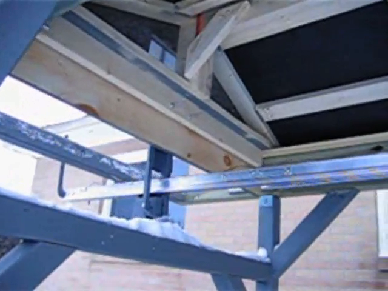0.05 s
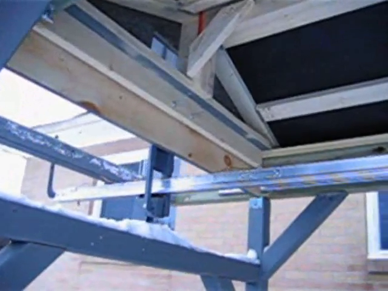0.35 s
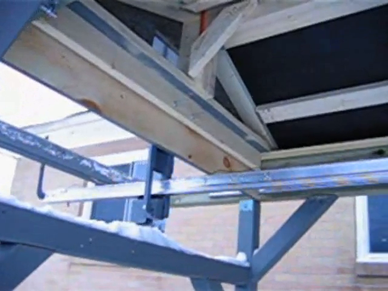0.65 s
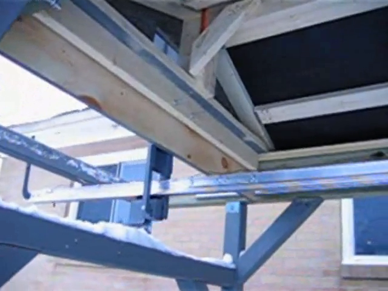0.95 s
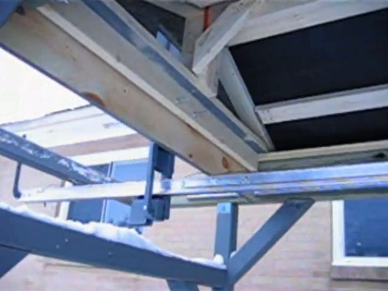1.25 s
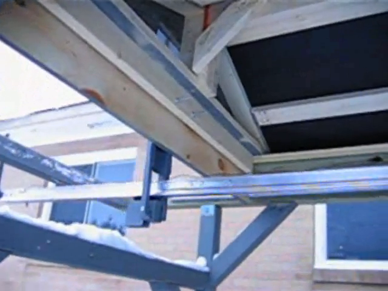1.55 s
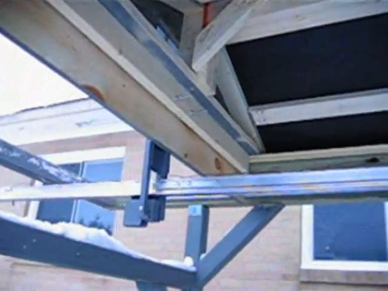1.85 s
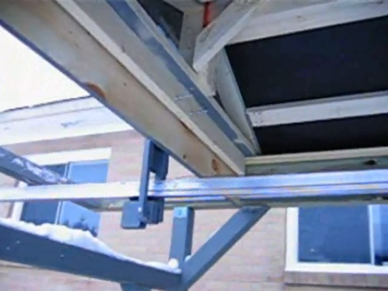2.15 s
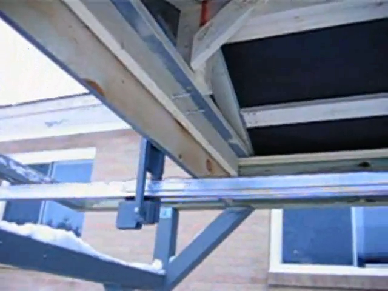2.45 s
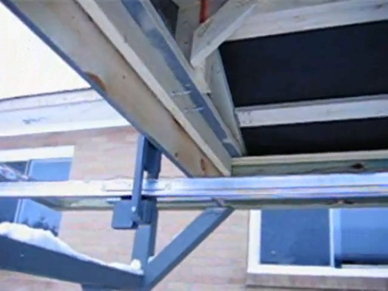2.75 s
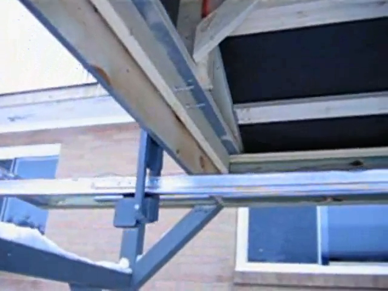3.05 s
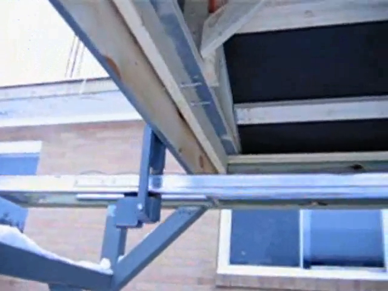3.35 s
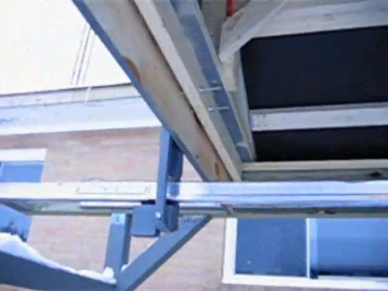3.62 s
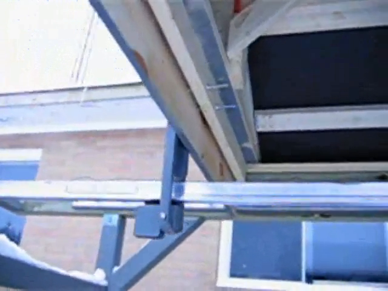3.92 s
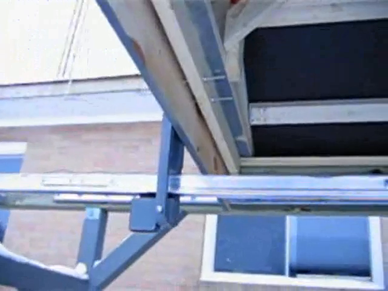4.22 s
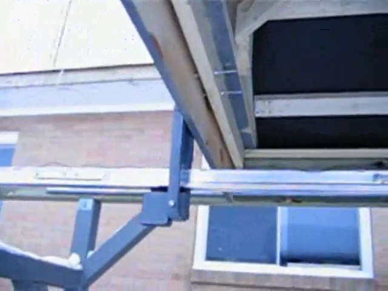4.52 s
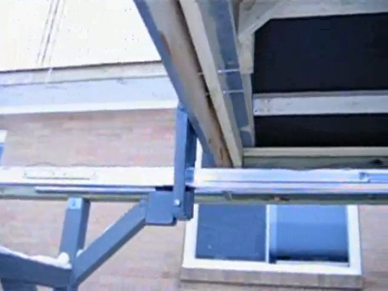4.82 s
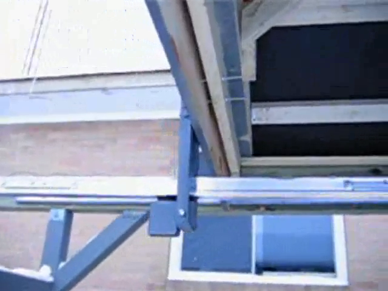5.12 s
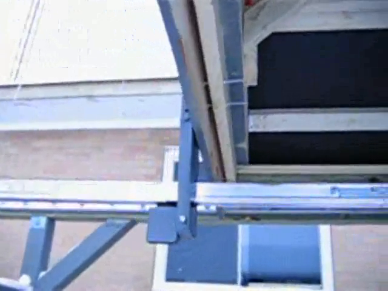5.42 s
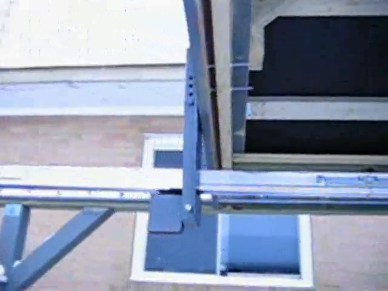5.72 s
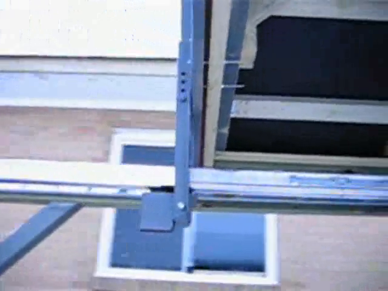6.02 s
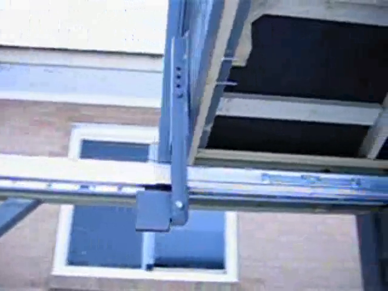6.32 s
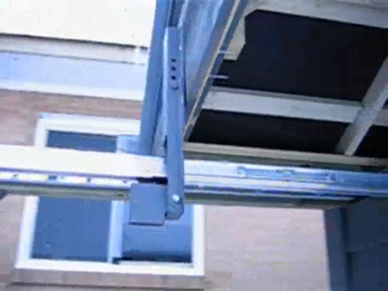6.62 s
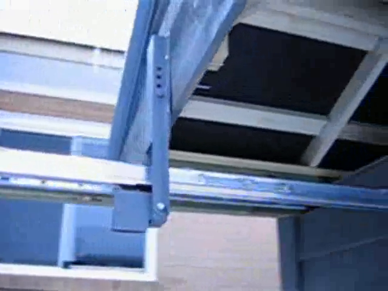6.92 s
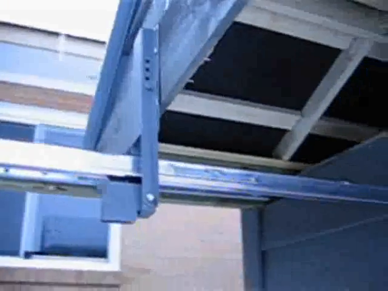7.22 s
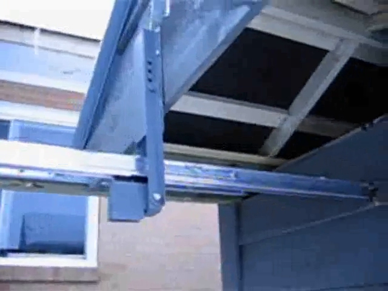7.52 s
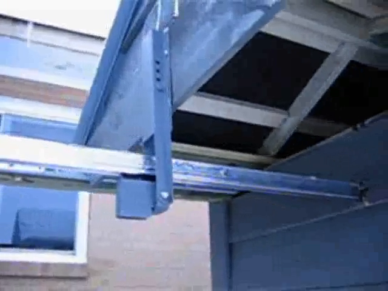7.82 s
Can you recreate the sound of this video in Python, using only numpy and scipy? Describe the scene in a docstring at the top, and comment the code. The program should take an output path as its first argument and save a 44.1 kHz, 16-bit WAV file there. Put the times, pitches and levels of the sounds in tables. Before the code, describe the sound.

Outdoors, just under the eaves, a wooden roof rolls along a metal rail with a continuous motor hum, gear whine and chain clatter. Sharp metal creaks and one dull wooden knock come early, followed by scattered chain clacks and a few more creaks. The wheels grind throughout, and the rattle swells toward the end as the roof comes overhead. Low wind rumbles on the microphone, with one late gust.

```python
"""A motor moves a shed roof

A geared mains motor drags a wooden shed roof along a steel rail, heard from just under the eaves.
The frame carries the motor's hum and gear whine. The drive chain rattles link by link, and the
wheels grind and groan. Steel fittings creak and squeal under the load, and the timber knocks once.
Wind or handling on the microphone adds a low rumble, with one gust."""
import sys
import numpy as np
from scipy import signal
from scipy.fft import rfft, irfft
from scipy.io import wavfile
from scipy.ndimage import uniform_filter1d

SR = 44100
rng = np.random.default_rng(int(sys.argv[2]) if len(sys.argv) > 2 else 0)


def generate_wav(signal):
    """Clip the signal to [-1, 1] and save it as 16-bit WAV at the path in sys.argv[1]."""
    frames = np.transpose(np.atleast_2d(signal))
    scaled = np.clip(frames, -1, 1) * 32767
    pcm = np.round(scaled).astype(np.int16)
    wavfile.write(sys.argv[1], SR, pcm)


N = 351036
T = np.arange(N) / SR

HUM_HZ = 120  # twice the mains frequency
# motor hum, swelling and dipping as the listener moves about the shed: time_s, level_db
HUM_LEVEL = [(0.04, -30), (0.88, -26), (1.22, -29), (1.46, -25), (1.64, -30), (2.02, -26), (2.4, -37),
             (2.5, -29.5), (6.24, -24), (6.5, -39.5), (6.6, -28.5), (7.48, -26), (7.6, -34), (7.94, -29.3)]
# the hum's overtone at twice its pitch: time_s, level_db
HUM_OCTAVE_LEVEL = [(0, -45), (.74, -38.5), (.86, -54), (.95, -35.5), (1.85, -33), (2.1, -43), (2.34, -62),
                    (2.48, -36.5), (3.05, -32), (3.62, -38.5), (4.4, -38.5), (5.08, -44), (5.32, -41),
                    (6.75, -41.5), (7.45, -34), (7.96, -35)]
# the hum's overtone at three times its pitch: time_s, level_db
HUM_THIRD_LEVEL = [(0, -42.5), (.9, -47), (1.9, -40), (3, -45), (5.5, -46.5), (6.2, -49), (7.2, -59),
                   (7.6, -43)]

GEAR_TEETH, TEETH_PER_LINK = 24, 40  # teeth that meet per shaft turn, and per chain link
USUAL_TOOTH_HZ, WHINE_DB_PER_HZ = 705, 0.19
# motor speed as gear teeth meeting per second, sagging under load: time_s, tooth_hz
MOTOR_SPEED = [(0, 699), (.9, 697), (1.08, 707), (1.5, 704), (2.3, 716), (2.56, 698), (2.9, 717),
               (3.3, 700), (4.22, 710), (4.34, 699), (4.62, 711), (4.94, 700), (5.7, 709), (6.08, 701),
               (6.34, 715), (6.65, 710), (7.2, 717), (7.96, 713)]
# gear whine at the usual speed, fading as the roof comes overhead: time_s, level_db
WHINE_LEVEL = [(0, -36), (.7, -39), (1.15, -39), (1.65, -37.5), (2.85, -36.5), (3.6, -40), (4.9, -34.5),
               (5.7, -39.5), (6.4, -38), (7.2, -47), (7.96, -49)]
# weaker gear tones beside the whine: cycles_per_turn, relative_db
GEAR_TONES = [(20, -12), (25, -13.5), (28, -19.5)]

# how far the roof has come overhead: time_s, share_0_to_1
ROOF_OVERHEAD = [(0, 0.24), (5.4, 0.37), (6.7, 0.6), (7.96, 0.62)]
# rise and fall of the chain's rattle: time_s, relative_db
RATTLE_LEVEL = [(0.04, -41.5), (0.28, -40.5), (1.78, -41.5), (2.32, -38.5), (5.0, -41), (5.64, -36.5),
                (5.88, -38.5), (6.4, -35), (7.94, -34)]
# tone colour of the chain as heard through the microphone, which shapes the highest treble,
# with the roof far away: frequency_hz, gain_db
CHAIN_HEARD_FAR = [(600, -8.5), (1100, 0.5), (1400, -5.5), (2000, -1.5), (2600, 3), (3200, -2.5),
                   (3950, -4.5), (5300, -17), (7000, -16.5), (7700, -18.5), (8600, -21), (9800, -34),
                   (12500, -47), (13700, -25), (15500, -32)]
# the same with the roof overhead: frequency_hz, gain_db
CHAIN_HEARD_NEAR = [(600, -1), (1400, -5), (1900, 1), (2350, 5), (2750, 1.5), (3200, -9.5), (4000, -19.5),
                    (5300, -29.5), (7600, -31), (8700, -18.5), (9800, -46), (12400, -45), (13400, -21),
                    (15500, -50)]
# links that snap hard onto the sprocket, the chain's toothed wheel: time_s, relative_db
LINK_CLACKS = [(0.1067, -25.5), (0.2394, -24.5), (0.2972, -19.5), (0.3556, -20), (0.414, -25), (0.471, -25),
               (2.6728, -23), (2.8394, -18), (3.0066, -21.5), (3.057, -21), (3.1148, -22.5),
               (3.1722, -21.5), (3.3657, -21.5), (4.0143, -23.5), (4.1574, -23.5), (4.4398, -28.5),
               (4.6199, -26), (4.899, -28), (5.4086, -25.5), (6.0841, -20.5), (6.354, -21.5), (6.7466, -27),
               (6.8538, -25), (7.636, -22.5)]
# tone colour of one clack as it is heard: frequency_hz, gain_db
CLACK_COLOUR = [(700, -22), (1500, -16), (2100, -2), (2700, 2), (3150, -1.5), (3600, -11.5), (4500, -5.5),
                (5500, -17), (7300, -14), (8300, -13), (9600, -39), (12500, -34), (13700, -30),
                (15500, -14)]

# rise and fall of the wheels' noise on the rail: time_s, relative_db
ROLL_LEVEL = [(0.04, -35.8), (1.4, -36.5), (1.78, -34.5), (3.04, -36.5), (3.6, -34), (4.14, -38),
              (6.48, -36.5), (6.74, -35.5), (7.94, -34.0)]
# tone colour of the wheels with the roof far away: frequency_hz, gain_db
WHEELS_FAR_COLOUR = [(130, -7), (200, -0.5), (275, 6), (315, -3.5), (410, -2), (500, 4.5), (590, -2.5),
                     (660, 0.5), (810, 1), (900, -8.5), (1100, -12), (1400, -15), (2500, -41)]
# the same with the roof overhead: frequency_hz, gain_db
WHEELS_NEAR_COLOUR = [(130, -2.5), (200, -10), (280, -0.5), (410, 0.5), (470, -5), (530, 1), (590, 2.5),
                      (830, -4), (890, -8), (950, 3.5), (1010, -12), (1090, -2.5), (1400, -38.5),
                      (2500, -46)]
# the higher of the roof beams' two booming notes: time_s, relative_db
HIGH_BEAM_LEVEL = [(0.04, -36), (0.38, -40.5), (3.06, -34.5), (3.62, -30), (4.2, -32.5), (4.82, -40.5),
                   (6.62, -37.5), (7.94, -40)]
# groans of a loaded wheel: start_s, length_s, start_pitch_hz, level_db
WHEEL_GROANS = [(1.7, 0.22, 512, -34.5), (6.637, 1.0, 488.7, -42)]

# slips of the creaking steel fittings: time_s, relative_db
FITTING_SLIPS = [(0.5357, -28), (0.5522, -24.5), (0.5997, -20.5), (0.64, -20), (0.6612, -24.5),
                 (0.871, -27), (0.8947, -30), (0.9288, -36), (1.031, -32), (1.7287, -29.5), (1.7388, -28),
                 (1.8412, -27.5), (1.861, -30), (1.9136, -34), (1.927, -24.5), (1.9447, -23.5),
                 (2.142, -32), (2.1643, -26.5), (2.1984, -28), (2.2852, -24), (2.3199, -21.5),
                 (2.3525, -20.5), (3.6339, -29), (4.0585, -26.5), (4.1042, -28), (4.1796, -30),
                 (5.311, -20.5), (5.3462, -30)]
# tone colour of one slip as it is heard: frequency_hz, gain_db
SLIP_COLOUR = [(1500, -9), (2600, -6), (3300, -12.5), (4000, 5), (4500, -6), (5000, -6), (5500, -15.5),
               (6300, -9.5), (7050, -7), (8000, -18.5), (9500, -48), (13000, -32), (15000, -20),
               (16000, -19)]
# notes a fitting rings with: pitch_hz, relative_db, ring_time_s
STEEL_NOTES = [(3380, 14, 0.081), (3915, -6, 0.012), (4570, -22, 0.01), (7380, -21.5, 0.051)]
# when a fitting squeals: start_s, length_s, relative_db
FITTING_SQUEALS = [(0.947, 0.39, -60)]
# tones of the squeal: pitch_hz, relative_db
SQUEAL_TONES = [(4910, 0), (6150, -3)]
# when the timber knocks: time_s, relative_db
TIMBER_KNOCKS = [(0.928, -19.5)]
# notes the timber rings with: pitch_hz, relative_db, ring_time_s
TIMBER_NOTES = [(260, -8, 0.12), (330, 5, 0.091), (414, 2, 0.41), (590, -18, 0.12), (600, 7, 0.045),
                (716, 10, 0.057), (934, 3.5, 0.15), (944, -15, 0.12), (1100, 2, 0.16), (1520, -7, 0.12),
                (1610, -14, 0.079)]
# tone colour of the timber's dull thud: frequency_hz, gain_db
THUD_COLOUR = [(150, -25), (400, 3), (650, 9), (1100, -9), (1650, -13.5), (2500, -31), (5000, -43)]

# low rumble of wind or handling on the microphone, with one gust: time_s, relative_db
LOW_RUMBLE_LEVEL = [(0.04, -33), (1.08, -33.5), (1.92, -35), (2.5, -34), (3.54, -37), (3.8, -32),
                    (6.4, -39.5), (6.66, -28.5), (7.42, -41), (7.94, -34)]
# tone colour of that rumble: frequency_hz, gain_db
RUMBLE_COLOUR = [(12, -20), (24, 9), (36, 17), (48, 7.5), (62, 5.5), (110, -12), (135, 6.5), (190, -12),
                 (300, -51)]


def motor_hum(flutter_db=1.01, flutter_rad=0.49):
    """The motor's magnets pull twice per mains cycle; the shaking frame makes the hum flutter."""
    out = 0
    for multiple, levels in enumerate([HUM_LEVEL, HUM_OCTAVE_LEVEL, HUM_THIRD_LEVEL], 1):
        phase = 2 * np.pi * HUM_HZ * multiple * T + flutter_rad * drift(4.5)
        level_db = curve(levels) + flutter_db * drift(25)
        out = out + undb(level_db) * np.sqrt(2) * np.sin(phase)
    return out


def gear_whine(tooth_hz):
    """Gear teeth whine as they meet, louder at speed; play between them blurs the weaker tones."""
    level_db = curve(WHINE_LEVEL) + WHINE_DB_PER_HZ * (tooth_hz - USUAL_TOOTH_HZ)
    unsteady_hz = tooth_hz * (1 + 0.002476 * drift(22))
    shaft_angle = 2 * np.pi * np.cumsum(unsteady_hz) / SR / GEAR_TEETH
    tones = undb(1.6 * drift(16)) * np.sin(GEAR_TEETH * shaft_angle)
    for cycles, tone_db in GEAR_TONES:
        play = 1.5 * drift(12)
        tones += undb(tone_db + 2 * drift(10)) * np.sin(cycles * shaft_angle + play)
    return undb(level_db) * np.sqrt(2) * tones


def link_landings(tooth_hz, jitter_s=0.003, force_spread_db=2.5, bounces=6):
    """Strength of the chain's hits over time: each link lands in its own way and bounces."""
    links_passed = np.cumsum(tooth_hz) / SR / TEETH_PER_LINK
    landings_s = np.interp(0.33 + np.arange(int(links_passed[-1])), links_passed, T)
    shape = (len(landings_s), bounces)
    lateness, hardness = rng.uniform(-1, 1, (len(landings_s), 2)).T[:, :, None]
    bounce_s = landings_s[:, None] + jitter_s * lateness + 0.006 * rng.standard_normal(shape)
    bounce_db = force_spread_db * hardness + 4.5 * rng.uniform(-1, 1, shape)
    return unit(bursts(bounce_s.ravel(), undb(bounce_db).ravel(), decay_s=0.008))


def chain_rattle(tooth_hz, overhead):
    """Links clatter onto the sprocket, slack chain jostles and slides, loose metal buzzes with the hum."""
    landings = link_landings(tooth_hz)
    jostle = uneven_bursts(rng.uniform(0, N / SR, 1200), spread_db=2.6, decay_s=0.005)
    buzz = uneven_bursts(np.arange(0, N / SR, 1 / HUM_HZ), spread_db=2, decay_s=0.005)
    buzz = unit(buzz * (1 + 0.3 * landings))  # swells with each link
    sliding = undb(0.5)
    power = (1.3 * landings) ** 2 + (undb(-3) * jostle) ** 2 + sliding ** 2
    power += overhead * (undb(1.5) * buzz) ** 2  # the buzz is only heard close by
    average_power = uniform_filter1d(power, SR // 2)
    force = np.sqrt(power / average_power) * rng.standard_normal(N)
    rattle = far_to_near(force, CHAIN_HEARD_FAR, CHAIN_HEARD_NEAR, overhead)
    return undb(curve(RATTLE_LEVEL) - 1.72) * rattle


def chain_clacks(overhead, overhead_treble_db=-15):
    """Tight links snap onto the sprocket, duller as the roof comes overhead."""
    out = np.zeros(N)
    hz, gain_db = np.transpose(CLACK_COLOUR)
    treble_share = np.clip(np.log2(hz / 2800), 0, 1)
    for time_s, db in LINK_CLACKS:
        treble_db = overhead_treble_db * np.interp(time_s, T, overhead)
        dulled = np.column_stack([hz, gain_db + treble_db * treble_share])
        add(out, time_s, strike(dulled, db + 2, decay_s=0.0011, tail_db=-8, tail_decay_s=0.008))
    return out


def rolling_wheels(overhead):
    """Wheels grind over the rough rail."""
    grit = uneven_bursts(rng.uniform(0, N / SR, 4000), spread_db=0.28, decay_s=0.0051)
    force = grit * rng.standard_normal(N)
    roll = far_to_near(force, WHEELS_FAR_COLOUR, WHEELS_NEAR_COLOUR, overhead)
    return undb(curve(ROLL_LEVEL) + 0.83) * roll


def beam_boom(overhead):
    """The shaken roof beams boom on two low notes."""
    low = undb(-42 + 12 * overhead) * noisy_note(hz=96, width_hz=35)
    high = undb(curve(HIGH_BEAM_LEVEL) - 4.1) * noisy_note(hz=141.4, width_hz=60)
    return low + high


def wheel_groans(fall_hz_per_s=45, roughness=0.62):
    """A loaded wheel sings a rough note that sinks steadily in pitch."""
    out = 0
    for start_s, length_s, start_hz, db in WHEEL_GROANS:
        pitch_hz = start_hz - fall_hz_per_s * (T - start_s)
        phase = 2 * np.pi * np.cumsum(pitch_hz) / SR
        rough = drift(70) * np.sin(phase) + drift(70) * np.cos(phase)
        out = out + undb(db) * swell(start_s, length_s) * unit(np.sin(phase) + roughness * rough)
    return out


def fitting_creaks():
    """Steel fittings slip under the load in small jerks; each jerk ticks and sets the steel ringing."""
    out = np.zeros(N)
    steel = ring(STEEL_NOTES)
    for time_s, db in FITTING_SLIPS:
        add(out, time_s, strike(SLIP_COLOUR, db + 4, decay_s=0.0018, tail_db=-6.5, tail_decay_s=0.022))
        add(out, time_s, undb(db - 14.5) * steel)
    return out


def timber_knock():
    """The timber gives with a dull thud and a short wooden ring."""
    out = np.zeros(N)
    for time_s, db in TIMBER_KNOCKS:
        add(out, time_s, undb(db - 0.5) * ring(TIMBER_NOTES))
        add(out, time_s, strike(THUD_COLOUR, db - 1, decay_s=0.0047, tail_db=2, tail_decay_s=0.025))
    return out


def fitting_squeal():
    """One fitting squeals faintly in a quick run of tiny slips."""
    slips_s = np.cumsum(rng.uniform(0.008, 0.024, 400))
    slips = uneven_bursts(slips_s, spread_db=3, decay_s=0.004)
    tones = sum(undb(db) * noisy_note(hz, width_hz=540) for hz, db in SQUEAL_TONES)
    loudness = sum(undb(db) * swell(start_s, length_s) for start_s, length_s, db in FITTING_SQUEALS)
    return slips * tones * loudness


def low_rumble():
    """Wind or handling on the microphone rumbles, with one gust."""
    return undb(curve(LOW_RUMBLE_LEVEL) - 2.7) * unit(colour(rng.standard_normal(N), RUMBLE_COLOUR))


def strike(tone_colour, peak_db, decay_s, tail_db, tail_decay_s):
    """One hit: a dry snap and a short crackle, then a duller shimmer."""
    t = T[:SR // 8]
    snap = undb(16.5) * (t == 0)
    crackle = np.exp(-t / decay_s) * rng.standard_normal(len(t))
    tail = np.exp(-t / tail_decay_s) * rng.standard_normal(len(t))
    shimmer = signal.lfilter(*signal.butter(1, 5000, fs=SR), tail)
    hit = colour(snap + crackle + undb(tail_db) * shimmer, tone_colour, size=1024)
    return undb(peak_db) * hit / np.abs(hit).max()


def ring(notes):
    """One second of a struck object's notes, each fading by 60 dB over its ring time."""
    t = T[:SR]
    out = sum((-1) ** k * undb(db - 60 * t / ring_time_s) * np.sin(2 * np.pi * hz * t)
              for k, (hz, db, ring_time_s) in enumerate(notes))
    return out / np.abs(out).max()


def noisy_note(hz, width_hz):
    """A note kept ringing by random shaking."""
    band = signal.butter(2, [hz - width_hz / 2, hz + width_hz / 2], "band", fs=SR, output="sos")
    return unit(signal.sosfilt(band, rng.standard_normal(N)))


def bursts(times_s, sizes, decay_s):
    """Loudness over time of many small hits, each dying away."""
    samples = np.clip(times_s * SR, 0, N).astype(int)
    energy = np.bincount(samples, sizes ** 2, N + 1)[:N]
    return np.sqrt(signal.lfilter([1], [1, -np.exp(-2 / (decay_s * SR))], energy + 1e-18))


def uneven_bursts(times_s, spread_db, decay_s):
    """Bursts of random strength at the given times."""
    sizes = undb(spread_db * rng.standard_normal(len(times_s)))
    return unit(bursts(times_s, sizes, decay_s))


def far_to_near(force, far_colour, near_colour, overhead):
    """Blend from the far tone colour to the near one as the roof comes overhead."""
    far, near = unit(colour(force, far_colour)), unit(colour(force, near_colour))
    return unit((1 - overhead) * far + overhead * near)


def colour(sound, tone_colour, size=16384):
    """Make some frequencies louder and others softer."""
    hz, db = np.transpose(tone_colour)
    grid_hz = np.maximum(np.arange(size // 2 + 1) * SR / size, 1)
    gains = undb(np.interp(np.log(grid_hz), np.log(hz), db))
    # fold the filter so that it rings only after a hit, never before
    folded = irfft(np.log(gains))
    folded[1:size // 2] *= 2
    folded[size // 2 + 1:] = 0
    response = irfft(np.exp(rfft(folded)))
    return signal.fftconvolve(sound, response)[:len(sound)]


def drift(rate_hz):
    """A smooth random wobble with a size near one."""
    wobble = np.interp(T * rate_hz, np.arange(2000), rng.standard_normal(2000))
    return unit(uniform_filter1d(wobble, int(SR / rate_hz)))


def swell(start_s, length_s, fade_s=0.057):
    """Fade in, hold, fade out."""
    return np.clip(np.minimum(T - start_s, start_s + length_s - T) / fade_s, 0, 1)


def curve(table):
    """Join a table's points in time with straight lines."""
    return np.interp(T, *np.transpose(table))


def add(out, time_s, sound):
    """Mix a sound into out at the given time."""
    start = max(int(time_s * SR), 0)
    out[start:start + len(sound)] += sound[:N - start]


def undb(db):
    """Turn decibels into a number to multiply by."""
    return 10 ** (np.asarray(db) / 20)


def unit(sound):
    """Scale to an average power of one."""
    return sound / np.sqrt(np.mean(sound ** 2))


def scene():
    """One motor speed drives gears and chain; the moving roof colours the sound; a faint hiss is below."""
    tooth_hz = curve(MOTOR_SPEED)
    overhead = curve(ROOF_OVERHEAD)
    drive = motor_hum() + gear_whine(tooth_hz) + chain_rattle(tooth_hz, overhead) + chain_clacks(overhead)
    low_sounds = rolling_wheels(overhead) + low_rumble() + beam_boom(overhead) + wheel_groans()
    strain = fitting_squeal() + fitting_creaks() + timber_knock()
    hiss = undb(-70) * rng.standard_normal(N)
    return (drive + low_sounds + strain + hiss)[None]


def record(dry):
    """Cut away the very highest treble, above 15850 Hz."""
    return signal.sosfilt(signal.ellip(10, 0.2, 80, 15850, fs=SR, output="sos"), dry)


dry = scene()
out = record(dry)
generate_wav(out)
```